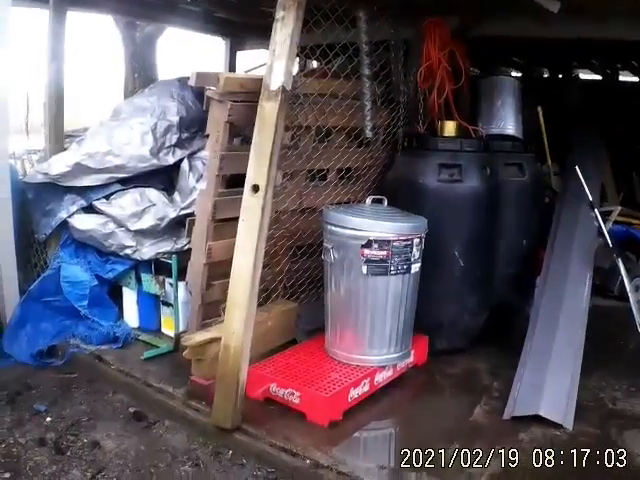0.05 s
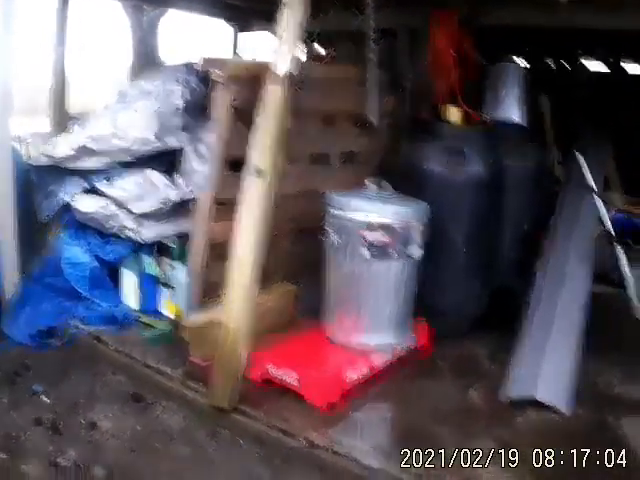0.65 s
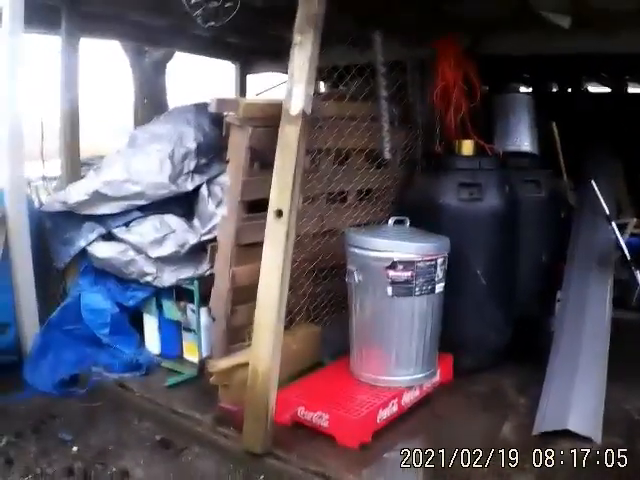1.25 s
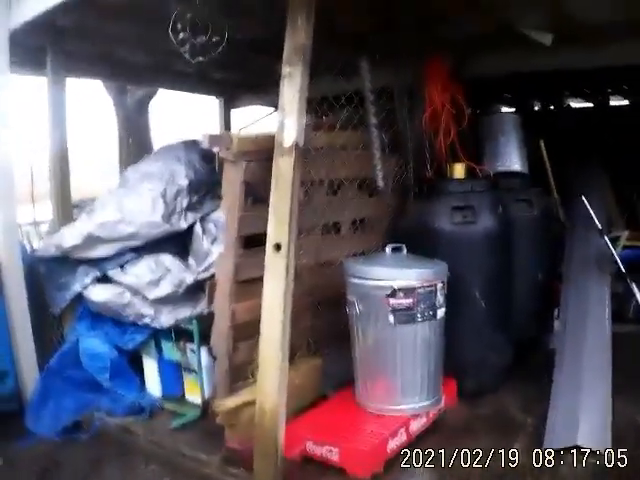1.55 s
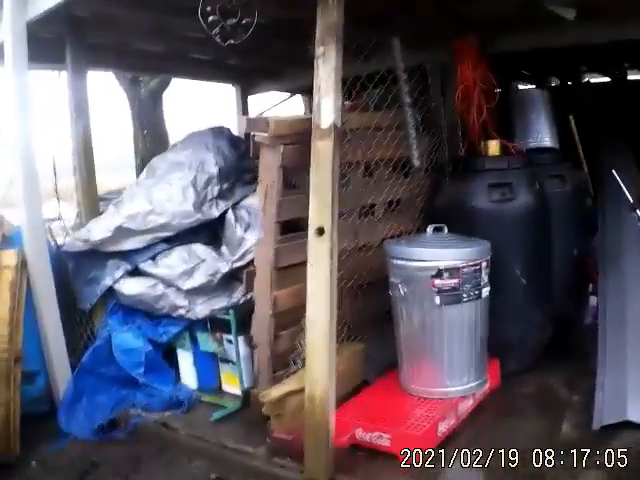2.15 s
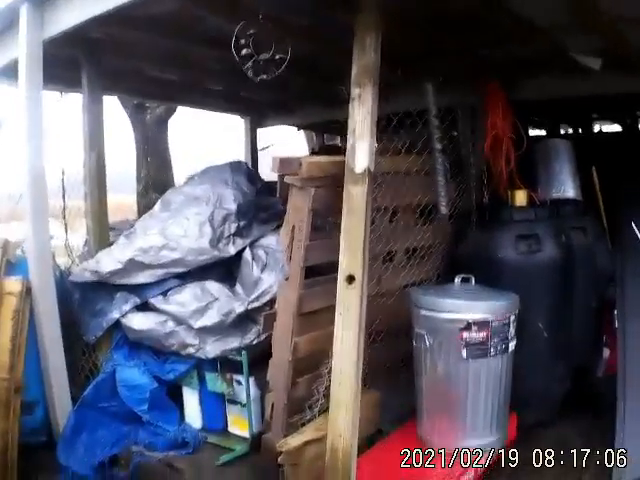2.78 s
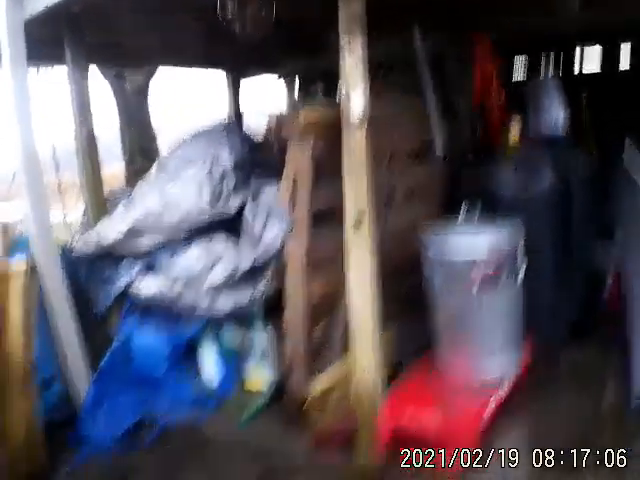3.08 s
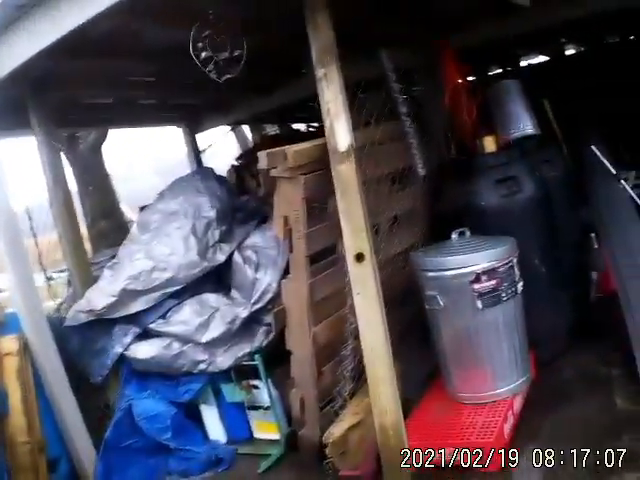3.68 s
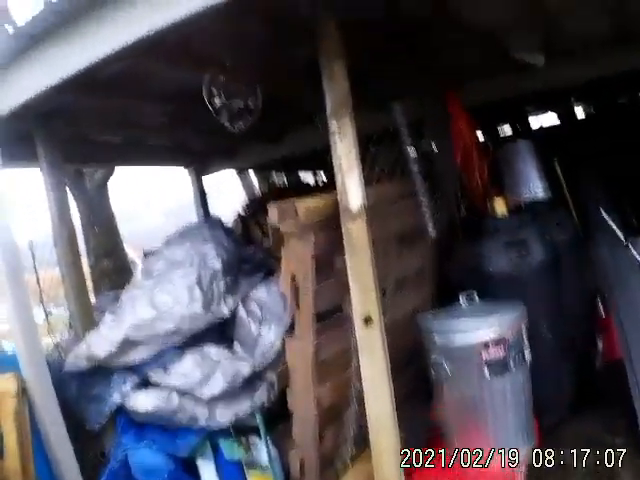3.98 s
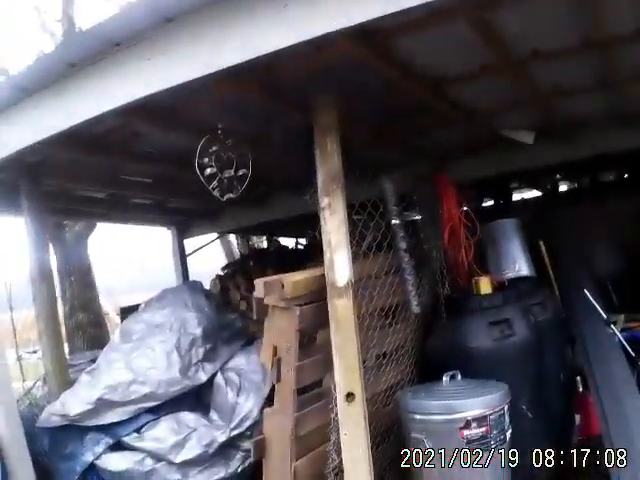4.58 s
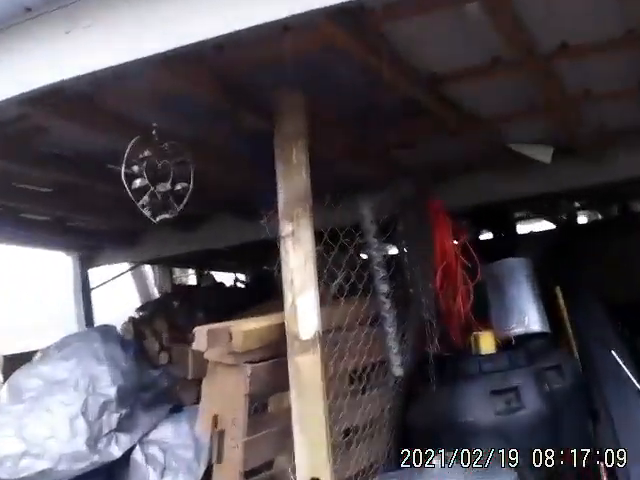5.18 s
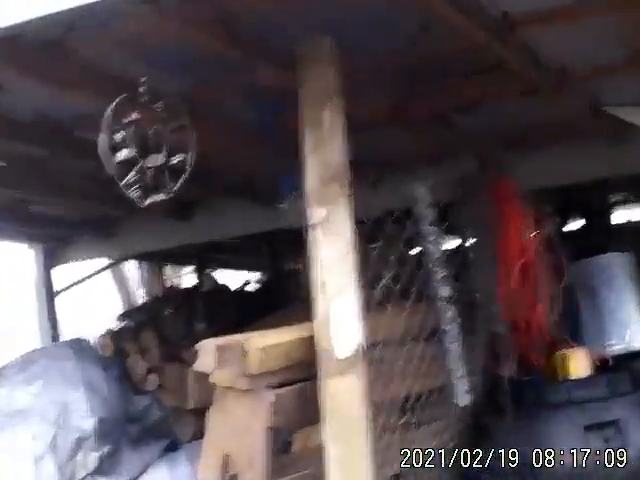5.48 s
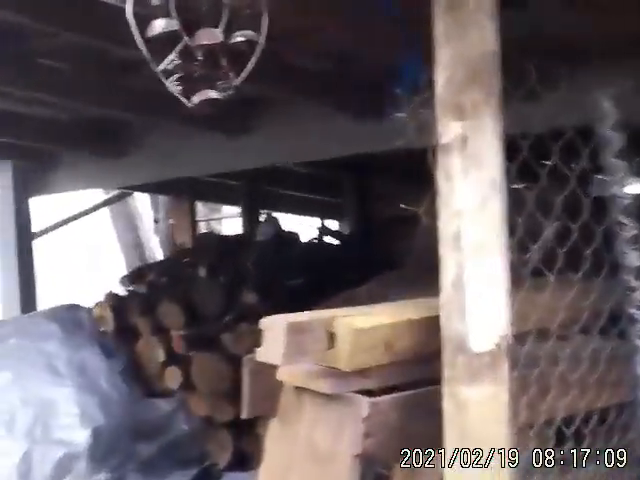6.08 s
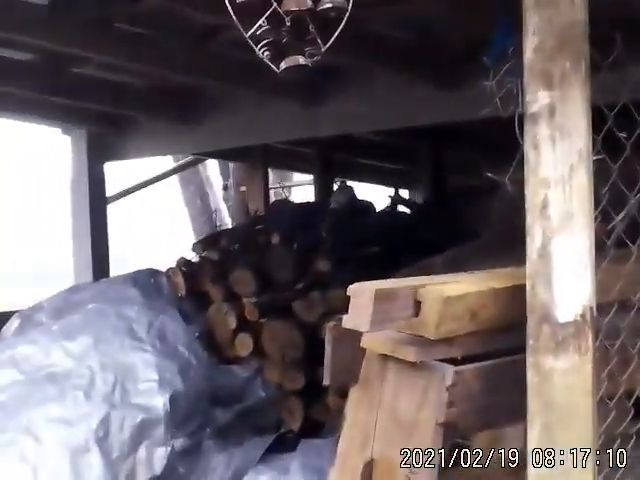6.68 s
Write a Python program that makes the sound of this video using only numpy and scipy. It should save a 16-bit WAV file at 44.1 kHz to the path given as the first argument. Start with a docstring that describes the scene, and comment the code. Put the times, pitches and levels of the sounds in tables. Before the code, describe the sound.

Rainwater splashes off a shed roof in irregular gulps, with single drops plopping into puddles and tapping sharply close by.

```python
"""An open shed in heavy rain: water runs off the roof and lands in irregular gulps on ground and puddles.
Each gulp is a burst of droplet impacts (hollow slosh, flat splat, bright spray) with ringing bubbles,
and it reverberates under the roof. Between the gulps a thin stream trickles; more rain falls far off.
Single drops plop into the puddles or tap on hard things close by, the hardest overloading the microphone."""
import sys
import numpy as np
from scipy import signal
from scipy.fft import rfft, irfft, next_fast_len
from scipy.io import wavfile
from scipy.ndimage import uniform_filter1d

SR = 44100
rng = np.random.default_rng(int(sys.argv[2]) if len(sys.argv) > 2 else 0)


def digitize_waveform(pressure):
    """Quantize a signal to 16-bit integers and store it at the path in sys.argv[1].

    Rows of a 2-D input are taken as channels; values are limited to [-1, 1].
    """
    field = np.atleast_2d(pressure).T
    bounded = np.clip(field, -1, 1)
    quanta = np.round(bounded * 32767).astype(np.int16)
    wavfile.write(sys.argv[1], SR, quanta)


N = 306054
TIME = np.arange(N) / SR


def undb(db):
    """Amplitude ratio of a level in decibels."""
    return 10 ** (np.asarray(db) / 20)

def unit(x):
    """Normalisation to rms 1."""
    return x / np.sqrt(np.mean(x ** 2))

def shaped(x, envelope):
    """Amplitude modulation, scaled to the rms of the envelope."""
    return unit(x * envelope) * np.sqrt(np.mean(envelope ** 2))

def add(track, start, sound):
    """Superposition of a sound on the track at start seconds."""
    i = int(np.clip(start * SR, 0, N - 1))
    track[i:i + len(sound)] += sound[:N - i]

def bins(x):
    """Fourier frequencies of x in Hz, at least 1."""
    return np.maximum(np.fft.rfftfreq(len(x), 1 / SR), 1)

def colour(x, points, extra_db=0, skirt_db_per_oct=24):
    """Spectral shaping through (f/Hz, level/dB) points, rolling off past the ends; rms 1."""
    octave, (hz, db) = np.log2(bins(x)), np.transpose(points)
    beyond = abs(octave - np.clip(octave, np.log2(hz[0]), np.log2(hz[-1])))
    gain_db = np.interp(octave, np.log2(hz), db) - skirt_db_per_oct * beyond + extra_db
    return unit(irfft(rfft(x) * undb(gain_db), len(x)))

def wander(x, step):
    """Linear interpolation over x between Gaussian values a step apart."""
    knots = np.arange(x[0], x[-1] + step, step)
    return np.interp(x, knots, rng.standard_normal(size=len(knots)))

def swell(t, length):
    """Rayleigh envelope: a quick rise and fall of peak near 1."""
    return 2.33 * t / length * np.exp(-(t / length) ** 2)

def droplets(size, per_s, spread_db):
    """Shot noise: a Poisson train of tiny impacts, a few much larger than the rest."""
    lands = rng.random(size) < per_s / SR
    return lands * rng.choice([-1, 1], size) * undb(spread_db * np.minimum(rng.exponential(size=size), 4))

# Spectrum of far rain: f/Hz, relative level/dB
RAIN_SPECTRUM = [(250, 1.5), (1300, -4.5), (4500, -4), (15000, -44)]
def distant_rain(level_db=-63, drift_db=2):
    """Countless far impacts sum incoherently to a faint, wavering hiss."""
    hiss = colour(droplets(N, 2700, 1.7), RAIN_SPECTRUM)
    return hiss * undb(level_db + drift_db * wander(TIME, .1))

# Rumble of a shifting hand: t/s, level/dB
HAND_LEVELS = [(.7, -76), (.87, -47), (1, -72), (3.13, -63), (3.21, -37.5), (3.28, -63), (4.4, -78.5)]
def handling():
    """Structure-borne sound: the hand that holds the microphone makes it rumble."""
    rumble = colour(rng.standard_normal(N), [(22, 19), (130, -4)])
    return rumble * undb(np.interp(TIME, *np.transpose(HAND_LEVELS)))

def shed(x, standpoints=20, t60=.66, build_s=.0025):
    """Reverberation: roof, posts and stacked things scatter a tail that varies as the listener moves."""
    out, t = np.zeros(N), TIME[:SR]
    for piece in np.array_split(np.arange(N), standpoints):
        tail = rng.standard_normal(SR) * np.exp(-np.log(1000) * t / t60) * (1 - np.exp(-t / build_s))
        tail /= np.sqrt(np.sum(tail ** 2))
        crossfade = np.cos(np.pi / 2 * np.clip((np.arange(N) - piece.mean()) / len(piece), -1, 1))
        first, last = max(piece[0] - len(piece), 0), piece[-1] + len(piece)
        add(out, first / SR, signal.fftconvolve((x * crossfade)[first:last], tail))
    return out

def ring(modes, pitch=1, contact_s=.0001, detune=.03, hold=1):
    """Damped modes build up during contact, detuned as no two drops strike the same spot; peak 1."""
    t = TIME[:2 ** 11]
    y = np.zeros(len(t))
    for hz, db, t60 in modes:
        mode_hz = hz * pitch * (1 + detune * rng.standard_normal())
        y += undb(db) * np.sin(2 * np.pi * mode_hz * t) * np.exp(-np.log(1000) * t / (hold * t60))
    soft_contact = signal.butter(2, [110, 8000], "band", fs=SR, output="sos")
    y = signal.sosfilt(soft_contact, y * (1 - np.exp(-(t / contact_s) ** 2)))
    return y / abs(y).max()

# High modes of a drop's impact, at pitch = hold = 1: f/Hz, relative level/dB, T60/s
HIGH_MODES = [(2110, -5, 0.0071), (3960, 3.5, 0.0044), (4630, 6.5, 0.0034), (6830, -8, 0.0042)]
def tick(**settings):
    """Impulse response: a drop excites high, quickly damped modes."""
    return ring(HIGH_MODES, **settings)

# Low modes of a drop's impact: frequency ratio, relative level/dB, T60/s
LOW_MODES = [(.6, -8.5, 0.0031), (.94, 1.5, 0.0097)]
def knock(hz, depth_oct):
    """A blunt push excites low modes, in a band that reaches depth_oct below hz."""
    band = signal.butter(2, [hz / 2 ** depth_oct, hz * 1.4], "band", fs=SR, output="sos")
    return -signal.sosfilt(band, ring(LOW_MODES, hz, contact_s=.00031))

def patter(water, count=210, over_db=1, spread_db=3, thud_share=.095):
    """Secondary impacts: drops thrown up by the splashes tick down, harder where more water falls."""
    out = np.zeros(N)
    flow = np.sqrt(uniform_filter1d(water ** 2, SR // 20).clip(0))
    for when, luck in rng.random((count, 2)):
        i = int(when * N)
        size = flow[i] * undb(over_db + spread_db * min(-np.log(1 - luck), 3))
        drop = tick(detune=.15) + thud_share * ring(LOW_MODES, hollow_at(i / SR), detune=.1)
        add(out, i / SR, size * drop)
    return out

def bubble(hz, t60, rise_per_s=3.35):
    """Bubble resonance: trapped air rings, rising in pitch as it nears the surface."""
    t = TIME[:2 ** 12]
    phase = 2 * np.pi * hz * t * (1 + rise_per_s * t / 2)
    return np.sin(phase) * (1 - np.exp(-t * hz)) * np.exp(-np.log(1000) * t / t60)

# Big drops in a puddle: t/s, f/Hz, level/dB
PUDDLE_DROPS = [(0.858, 530, -26), (1.425, 490, -16), (2.086, 486, -14.5), (3.223, 600, -13.5),
                (3.457, 1250, -13), (4.312, 724.3, -31), (4.994, 855, -22.5), (5.863, 634, -18.5),
                (6.189, 834, -17)]
def plops(bubble_db=-6):
    """Air entrainment: a drop thumps into a puddle and traps a ringing bubble."""
    out = np.zeros(N)
    for start, hz, db in PUDDLE_DROPS:
        add(out, start, undb(db) * knock(hz, depth_oct=.57))
        add(out, start, undb(db + bubble_db) * bubble(hz, t60=.04))
    return out

# Close drops on hard things: t/s, tick level/dB, tick pitch ratio, thud level/dB, thud f/Hz
CLOSE_DROPS = [(0.276, -12.5, 0.69, -37, 560), (1.0749, -9, 0.91, -24.5, 467), (1.962, -12, 1.13, -55, 500),
               (2.8675, -11, 0.71, -47, 590), (3.7478, 3.5, 0.65, -5.5, 530), (4.071, -9.5, 0.63, -28, 603),
               (4.63, 7.5, 1, -3.5, 675), (4.7239, -6.5, 0.98, -19, 740), (5.0692, 2, 1.06, -5, 585),
               (5.957, 2.5, 1.02, -3.5, 704), (6.0893, -9.5, 0.97, -24.5, 705),
               (6.5427, -14.5, 0.82, -10, 710), (6.7969, -7, 0.75, -19.5, 570), (6.91, 5.5, 0.97, -7, 690)]
def taps(echo_s=.0113, echo_db=-12):
    """Impact and reflection: a tick, shorter when blunt, and a knock both echo off the roof."""
    out = np.zeros(N)
    for start, tick_db, pitch, thud_db, thud_hz in CLOSE_DROPS:
        tap = undb(tick_db) * tick(pitch=pitch, contact_s=.0002 * pitch, hold=pitch ** 2)
        tap += undb(thud_db) * knock(thud_hz, depth_oct=1.47)
        add(out, start, tap)
        add(out, start + echo_s, undb(echo_db) * tap)
    return out

# Spectrum of the finest droplets: f/Hz, relative level/dB
MIST_SPECTRUM = [(7500, 15.5), (12000, -8), (15000, -17)]
def sizzle(t):
    """The smallest impacts make shot noise high in the treble."""
    return colour(droplets(len(t), 3500, 2.7), MIST_SPECTRUM)

# Puffs of the finest spray: t/s, length/s, level/dB
MIST_PUFFS = [(3.944, 0.025, -30.5), (5.81, 0.037, -43.5)]
def mists():
    """Atomised water comes down in a brief swell of sizzle."""
    out, t = np.zeros(N), TIME[:2 ** 13]
    for start, length, db in MIST_PUFFS:
        add(out, start, undb(db) * swell(t, length) * sizzle(t))
    return out

# Cavities opened by the gulps: t/s, length/s, initial f/Hz, level/dB
CAVITIES = [(0.226, .045, 582, -35.5), (0.4, 0.049, 1408, -29), (1.072, 0.02, 1596, -35.5),
            (1.076, 0.015, 3780, -29.5), (1.163, 0.048, 352, -41), (1.64, 0.05, 1165, -30.5),
            (2.343, 0.033, 1030, -34.5), (2.889, 0.031, 3530, -24.5), (3.262, 0.03, 621, -38),
            (3.48, 0.051, 597, -37.5), (3.659, 0.027, 1400, -26.5), (3.69, 0.025, 576, -34.5),
            (3.957, 0.026, 584, -38), (4.415, 0.046, 745.4, -37), (5.1, .06, 696, -39),
            (5.33, 0.022, 2620, -29), (5.416, 0.049, 2890, -31), (5.601, 0.011, 3990, -27.5)]
def glugs(bandwidth_share=.3, roughness=1.54, glide_oct_per_s=-2):
    """Cavity resonance: a rough, hollow note slides down as the opening widens."""
    out, t = np.zeros(N), TIME[:2 ** 14]
    for start, length, hz, db in CAVITIES:
        step = 1 / (bandwidth_share * hz)
        wobble = 1 + roughness * (wander(t, step) + 1j * wander(t, step))
        phase = 2 * np.pi * np.cumsum(hz * 2 ** (glide_oct_per_s * t)) / SR
        note = (wobble * np.exp(1j * phase)).real
        add(out, start, undb(db) * shaped(note, swell(t, length)))
    return out

def gurgle(hz, count=6, scatter=.1778, within_s=.079, t60=.073):
    """A splash frees a cluster of bubbles whose resonances scatter log-normally around hz."""
    out = np.zeros(2 ** 13)
    for _ in range(count):
        note = rng.random() * bubble(hz * np.exp(scatter * rng.standard_normal()), t60)
        i = int(within_s * rng.random() * SR)
        out[i:i + len(note)] += note
    return out

# The hollow that the water digs in the puddle: t/s, f/Hz
HOLLOW_PITCH = [(.3, 521), (1.2, 395), (2.2, 473), (2.8, 608), (4, 566), (4.4, 730), (5.1, 652), (6, 710)]
def hollow_at(start):
    """Resonant frequency of the hollow at start seconds."""
    return np.interp(start, *np.transpose(HOLLOW_PITCH))

def spatter(t, points, per_s, spread_db, extra_db=0, shreds=3, ragged_db=4.5, ragged_s=.00786):
    """Fragmentation: water lands in shreds, flaring droplet clusters with their own resonances."""
    out, octave = np.zeros(len(t)), np.log2(bins(t))
    for _ in range(shreds):
        impacts = droplets(len(t), per_s / shreds, spread_db)
        resonances_db = 5 * wander(octave, step=.17)
        out += colour(impacts, points, extra_db + resonances_db) * undb(ragged_db * wander(t, ragged_s))
    return out

# Spells of a thin stream off the roof: start t/s, end t/s, spray level/dB, burble level/dB
STREAM_SPELLS = [(0.018, .3, -42.5, -44.5), (0.558, .85, -56, -59), (1.129, 1.75, -39, -42),
                 (1.782, 2.55, -34.5, -47.5), (2.622, 2.86, -48.5, -42), (3.239, 3.9, -42, -40.5),
                 (4.202, 4.35, -52, -57), (4.99, 5.06, -38.5, -42), (5.466, 5.76, -45.5, -52),
                 (6.041, 6.45, -42, -45), (6.598, 6.94, -31.5, -42)]
def trickle(every_s=.06, length_s=.034, scatter_db=3, splat_db=-10):
    """Jet break-up: a thin stream parts into small uneven dollops, each a row for splashes()."""
    rows = []
    for first, last, spray_db, burble_db in STREAM_SPELLS:
        for start in np.arange(first, last, every_s):
            late, low, middle, high, fine = rng.standard_normal(5)
            levels = (burble_db + scatter_db * low, spray_db + splat_db + scatter_db * middle,
                      spray_db + scatter_db * high)
            tilt_db_per_oct = -1 + 5 * fine
            rows.append((start + every_s * late / 4, length_s, *levels, tilt_db_per_oct))
    return rows

def lump(start, length, spray_db, body_db):
    """A row for splashes(): a lump with more body sloshes harder and shatters finer."""
    splat_db = spray_db + body_db
    slosh_db = splat_db - 5
    tilt_db_per_oct = 7 + .4 * body_db
    return start, length, slosh_db, splat_db, spray_db, tilt_db_per_oct

def bursts(heavy_db=-12, length_s=.016, over_thud_db=-27.5):
    """Splash threshold: only the heavy close drops burst into spray."""
    return [lump(start, length_s, thud_db + over_thud_db, body_db=5.5)
            for start, _, _, thud_db, _ in CLOSE_DROPS if thud_db > heavy_db]

# Gulps off the roof: t/s, length/s, spray level/dB, body/dB (splat over spray)
ROOF_GULPS = [(.005, 0.0064, -36, 11.5), (.088, 0.016, -28, -1), (.208, 0.028, -31, 2),
              (.367, 0.063, -39.5, -1.5), (.402, 0.042, -29, -1), (.884, 0.049, -36, -5),
              (1.07, 0.039, -36, -9), (1.305, 0.029, -23.5, -9), (1.426, 0.032, -26, -6),
              (1.565, 0.043, -26.5, -9), (1.66, 0.079, -28.5, -3.5), (1.801, 0.016, -27, -11.5),
              (1.874, 0.043, -28.5, -7.5), (2.091, 0.029, -33.5, -11.5), (2.232, 0.055, -32, -19),
              (2.284, 0.02, -28, -11.5), (2.344, 0.023, -24, -2.5), (2.782, 0.062, -38, -61),
              (2.878, 0.075, -38, -2.5), (2.953, 0.042, -29, -0.5), (3.15, 0.073, -35.5, 3),
              (3.328, 0.05, -25, -18), (3.445, 0.048, -27.5, -0.5), (3.684, 0.036, -26.5, -1.5),
              (3.919, 0.029, -23.5, -8), (3.953, 0.036, -23, -2), (4.135, 0.027, -33, -1.5),
              (4.215, .02, -35, -10.5), (4.359, 0.044, -31, -7), (4.405, 0.062, -34.5, 0.5),
              (4.518, 0.024, -22.5, -16.5), (4.595, 0.092, -26, -5.5), (4.773, 0.023, -25.5, -11.5),
              (4.927, 0.02, -38, 2.5), (5.07, 0.063, -33.5, -2), (5.333, 0.036, -29.5, -6),
              (5.415, 0.038, -28.5, -5), (5.438, 0.022, -22.5, -28), (5.825, 0.065, -41, 0),
              (5.911, 0.056, -35, 6), (5.996, 0.022, -23.5, -6), (6.34, 0.029, -32, -9),
              (6.629, 0.043, -22.5, -5.5), (6.766, 0.032, -26.5, 0), (6.862, 0.049, -50.5, 15)]
def gulps():
    """Unsteady run-off falls as solid lumps (high body) or loose showers (low body)."""
    return [lump(*row) for row in ROOF_GULPS]

# Spectrum of the slosh: ratio to the hollow's resonance, relative level/dB
SLOSH_SPECTRUM = [(.2, -22), (.55, -3.5), (.8, -3.5), (1.4, -1.5), (2.3, -12.5)]
# Spectra of the flat splat and the bright spray: f/Hz, relative level/dB
SPLAT_SPECTRUM = [(600, -9.5), (950, 0.5), (1400, -6), (1750, -1.5), (2800, 1.5)]
SPRAY_SPECTRUM = [(2800, -7), (4400, 5.5), (5200, 2.5), (6200, -7.5), (8200, -20), (13500, -38.5)]
def splashes(landings, hollow_db=11, hollow_oct=.22, attack_share=.079, crack_db=-14, crack_s=.0065):
    """Impact noise and resonance: each landing is a short burst of droplets in three bands, with bubbles."""
    out = np.zeros(N)
    for start, length, slosh_db, splat_db, spray_db, tilt_db_per_oct in landings:
        t = TIME[:next_fast_len(int(4 * max(length, .02) * SR))]
        hz, hollow_hz = bins(t), hollow_at(start)
        envelope = (1 - np.exp(-t / (attack_share * length))) ** 2 * np.exp(-(t / length) ** 2 / 2)
        resonance_db = hollow_db * np.exp(-(np.log2(hz / hollow_hz) / hollow_oct) ** 2)
        tilt_db = tilt_db_per_oct * np.clip(np.log2(hz / 4500), -.5, .8)  # finer spray is brighter
        slosh = spatter(t, np.array(SLOSH_SPECTRUM) * [hollow_hz, 1], 900, 2.5, resonance_db, shreds=1)
        splat = spatter(t, SPLAT_SPECTRUM, 2500, 4.3)
        spray = spatter(t, SPRAY_SPECTRUM, 5000, 2.4, tilt_db)
        for band, db in (slosh, slosh_db - 3), (splat, splat_db), (spray, spray_db):
            add(out, start, undb(db) * shaped(band, envelope))
        # first contact cracks off the finest droplets
        add(out, start, undb(spray_db + crack_db) * np.exp(-t / crack_s) * sizzle(t))
        # the slosh traps large bubbles, the splat small ones, the spray tiny ones
        add(out, start, undb(slosh_db + 3) * gurgle(hollow_hz))
        add(out, start, undb(splat_db + 1) * gurgle(1400, count=8, t60=.024))
        add(out, start, undb(spray_db + 1) * gurgle(4390, t60=.0066))
    return out

def scene(shed_db=-5.3, tap_send_db=-10, bubble_send_db=-7):
    """Direct plus reverberant sound: splashes fill the shed; glugs, plops and taps stay drier."""
    water = splashes(gulps() + bursts() + trickle()) + mists()
    bubbles = glugs() + plops()
    close = taps()
    water += undb(shed_db) * shed(water + undb(bubble_send_db) * bubbles + undb(tap_send_db) * close)
    return (water + patter(water) + bubbles + close + distant_rain() + handling())[None]

def record(dry, ceiling=.82, distortion_hz=9000, top_hz=16100):
    """Saturation: the small microphone flattens and dulls the hardest taps; a low-pass cuts the top."""
    excess = dry - dry / (1 + (dry / ceiling) ** 6) ** (1 / 6)
    clipped = dry - signal.sosfiltfilt(signal.butter(4, distortion_hz, fs=SR, output="sos"), excess)
    return signal.sosfilt(signal.ellip(8, .2, 70, top_hz, fs=SR, output="sos"), clipped)


dry = scene()
out = record(dry)
digitize_waveform(out)
```